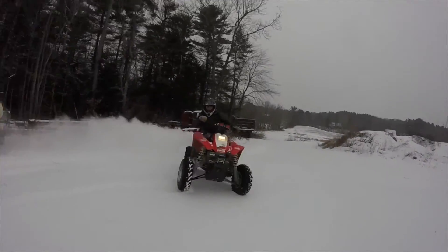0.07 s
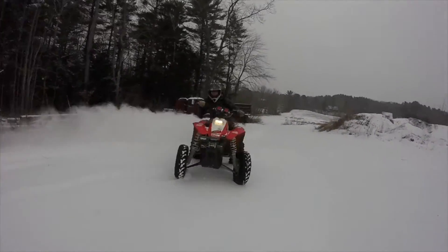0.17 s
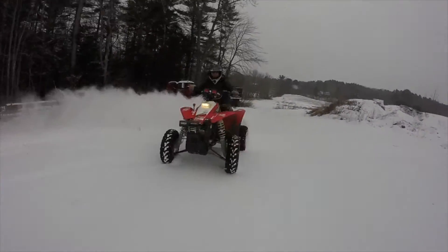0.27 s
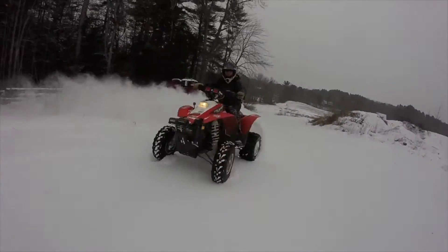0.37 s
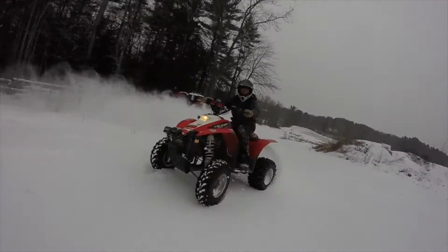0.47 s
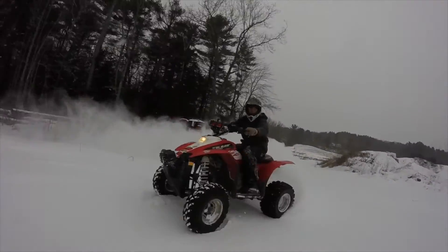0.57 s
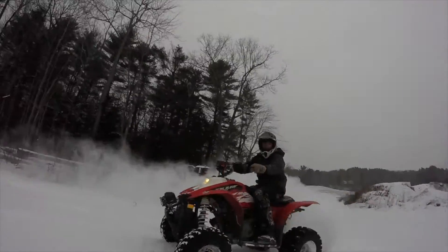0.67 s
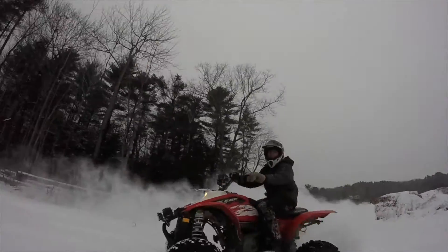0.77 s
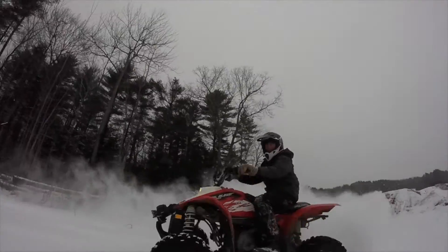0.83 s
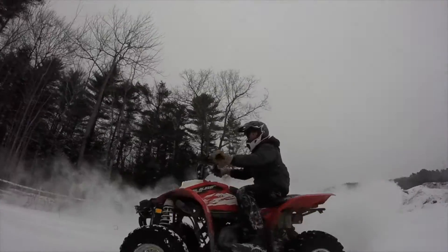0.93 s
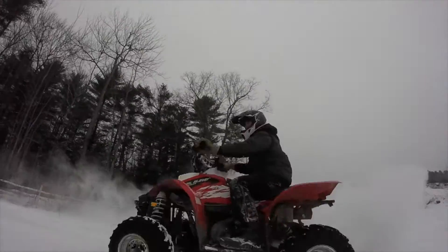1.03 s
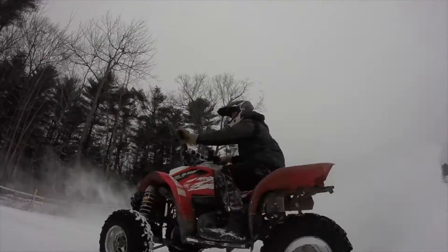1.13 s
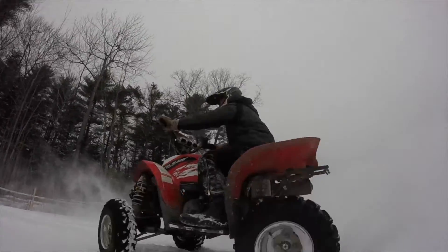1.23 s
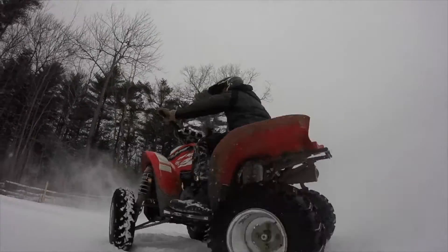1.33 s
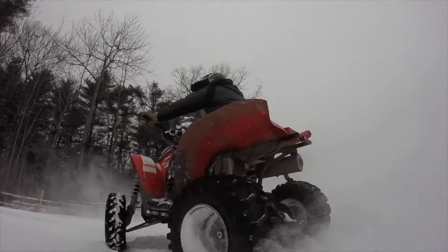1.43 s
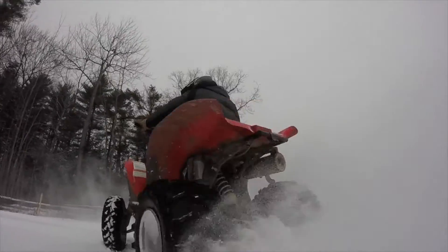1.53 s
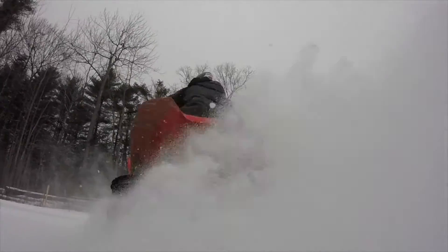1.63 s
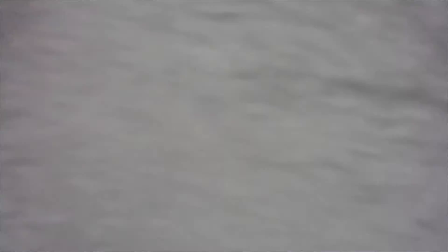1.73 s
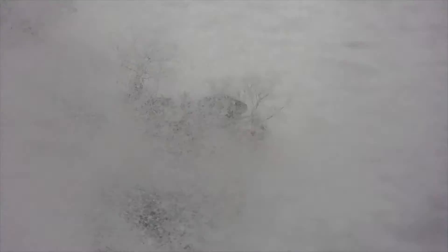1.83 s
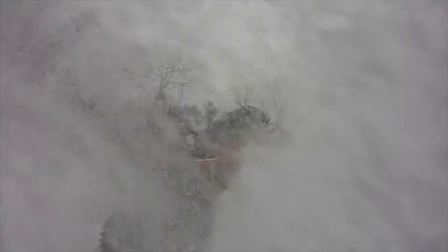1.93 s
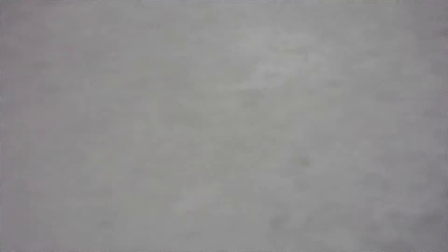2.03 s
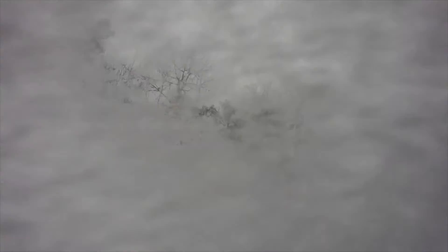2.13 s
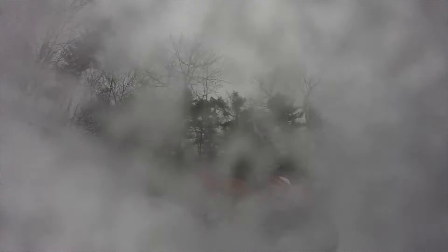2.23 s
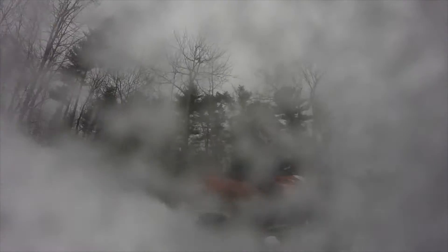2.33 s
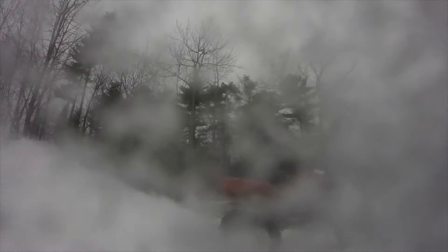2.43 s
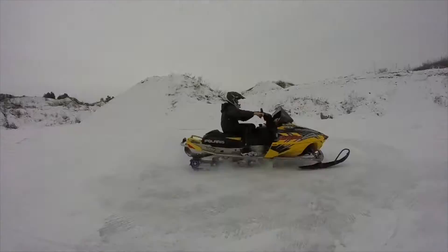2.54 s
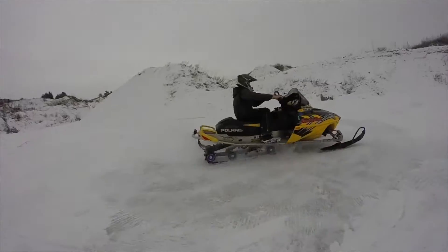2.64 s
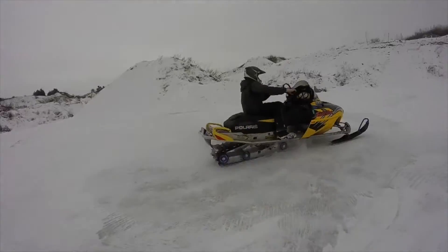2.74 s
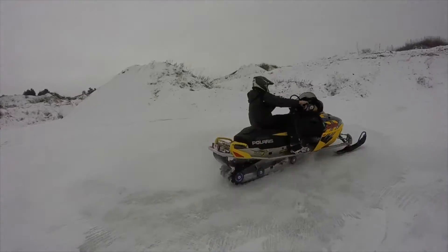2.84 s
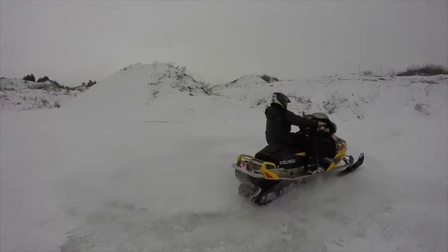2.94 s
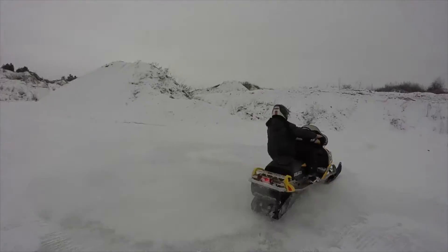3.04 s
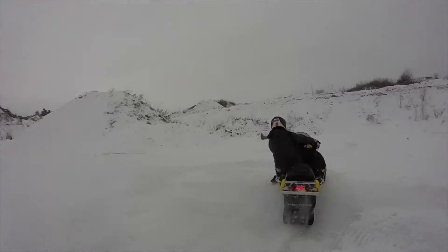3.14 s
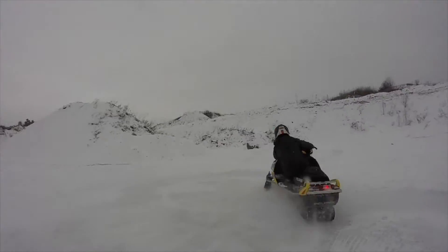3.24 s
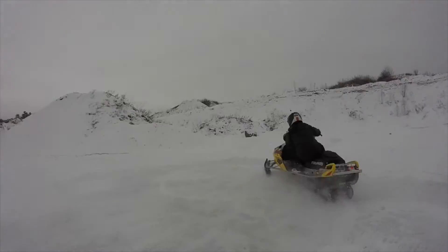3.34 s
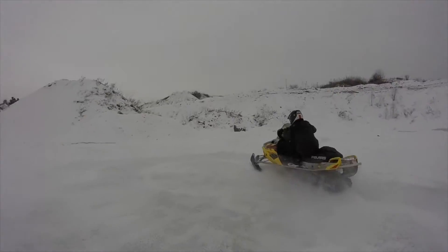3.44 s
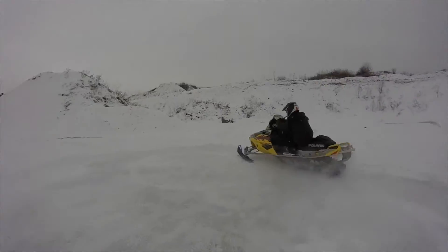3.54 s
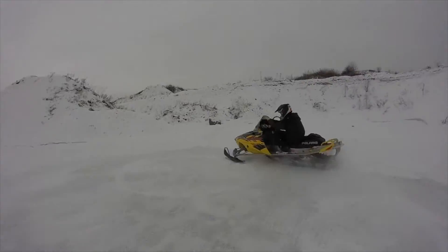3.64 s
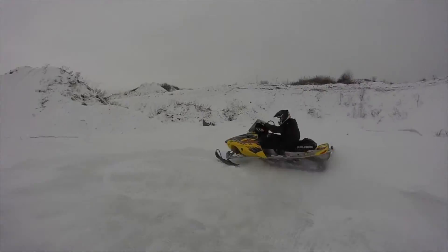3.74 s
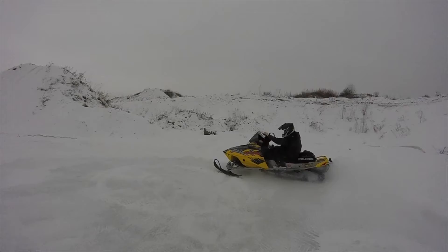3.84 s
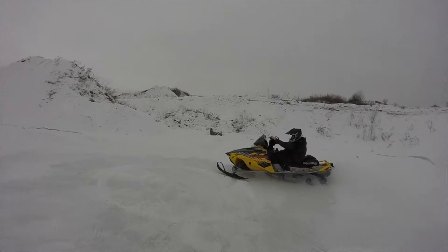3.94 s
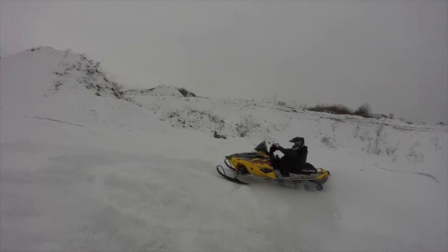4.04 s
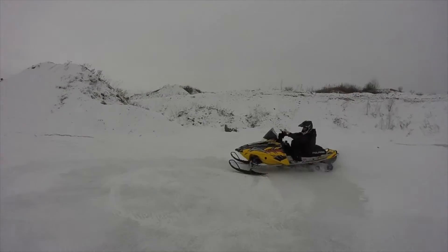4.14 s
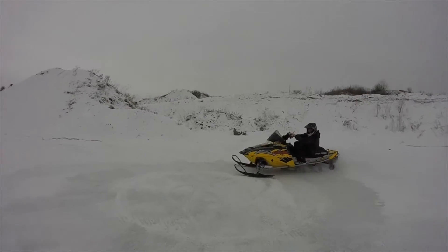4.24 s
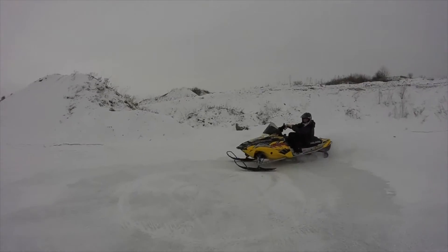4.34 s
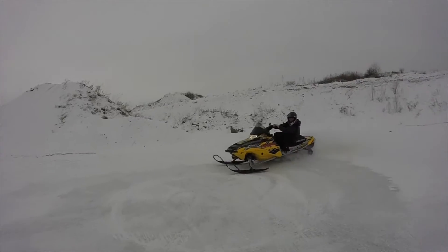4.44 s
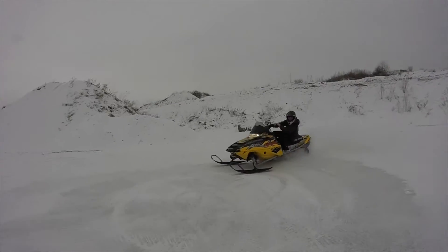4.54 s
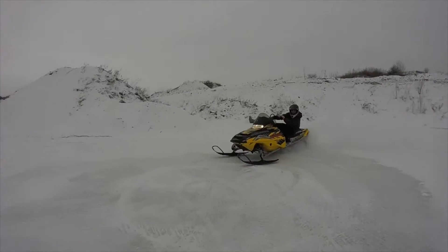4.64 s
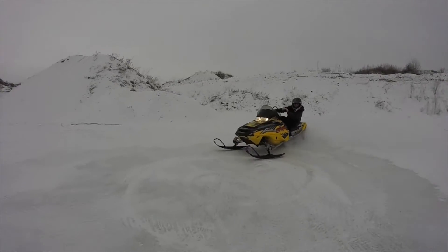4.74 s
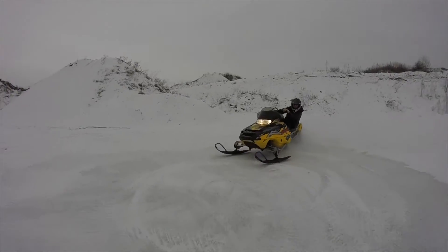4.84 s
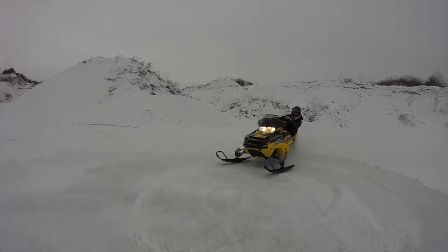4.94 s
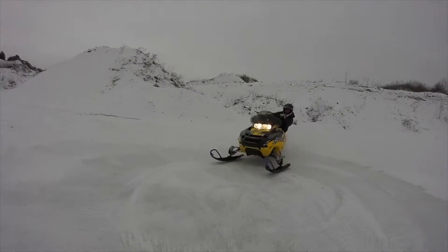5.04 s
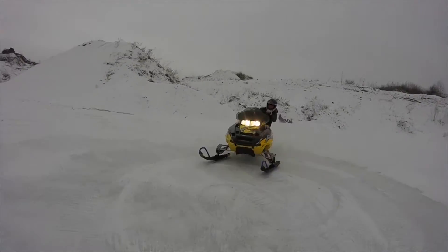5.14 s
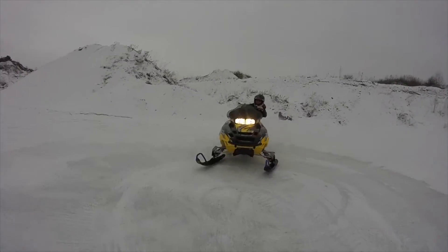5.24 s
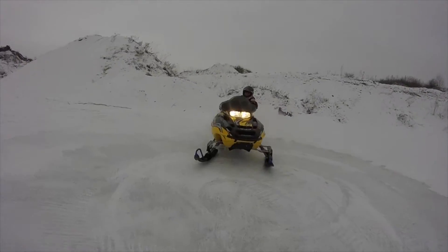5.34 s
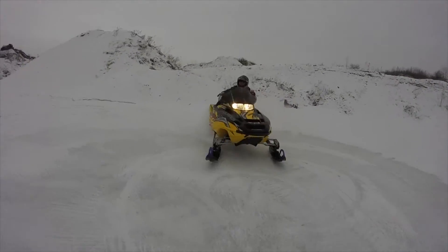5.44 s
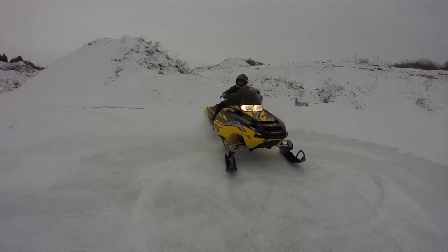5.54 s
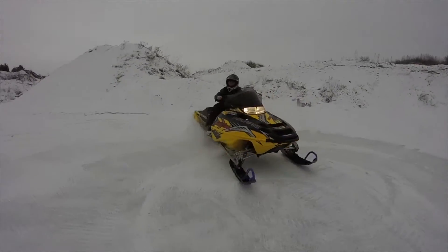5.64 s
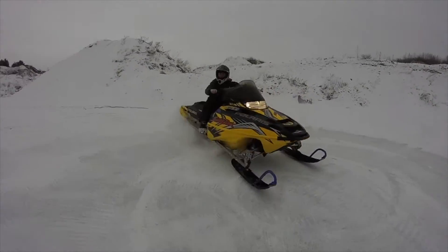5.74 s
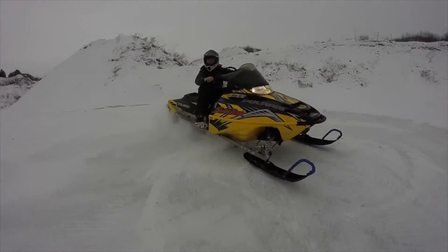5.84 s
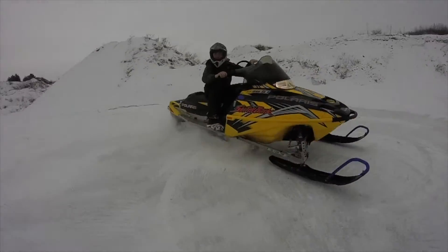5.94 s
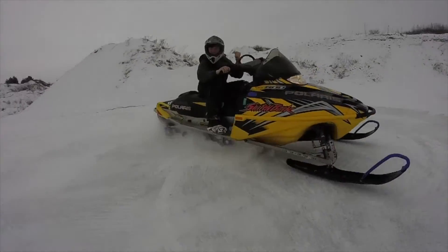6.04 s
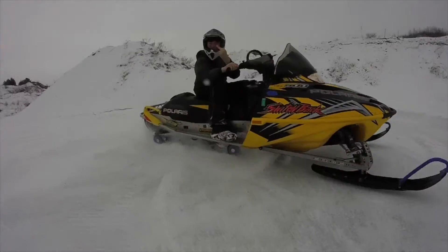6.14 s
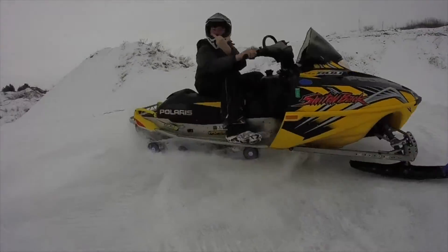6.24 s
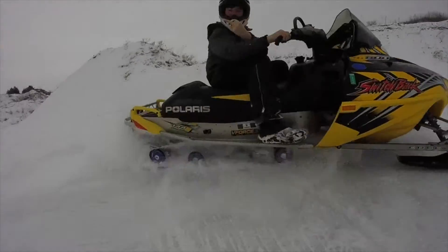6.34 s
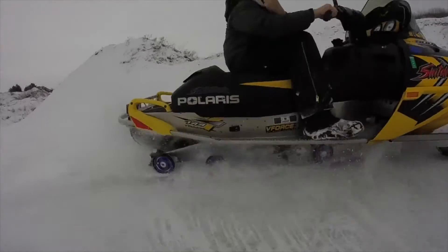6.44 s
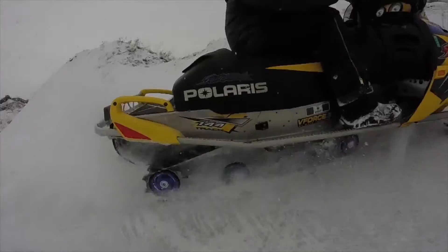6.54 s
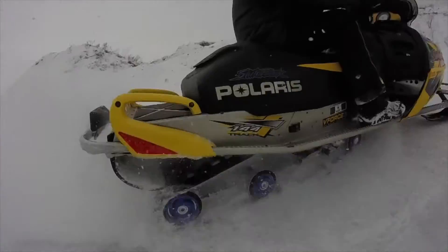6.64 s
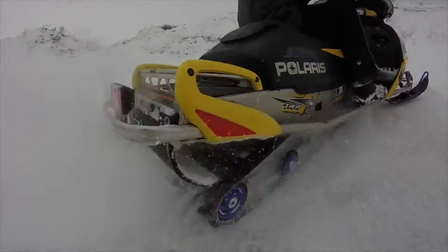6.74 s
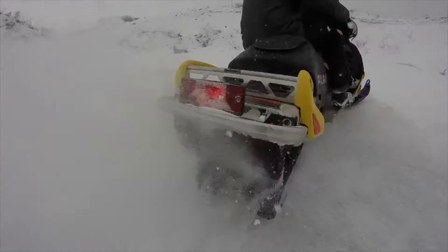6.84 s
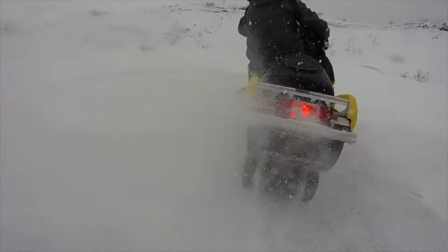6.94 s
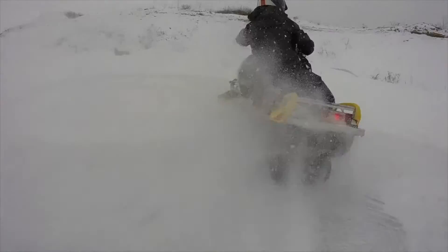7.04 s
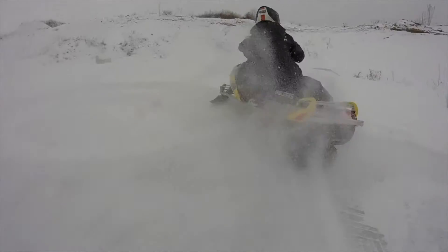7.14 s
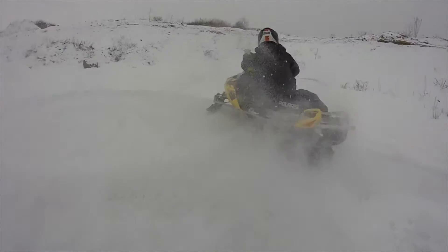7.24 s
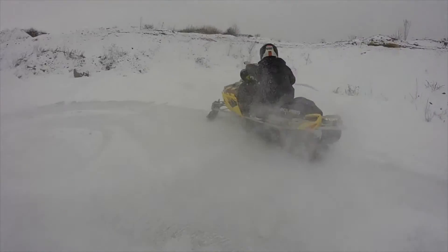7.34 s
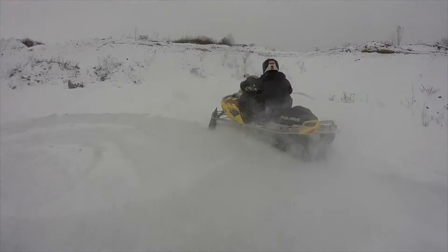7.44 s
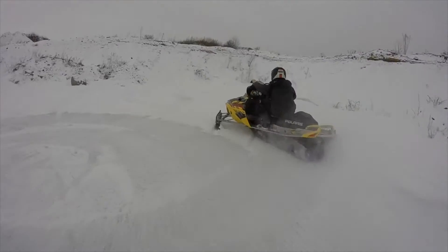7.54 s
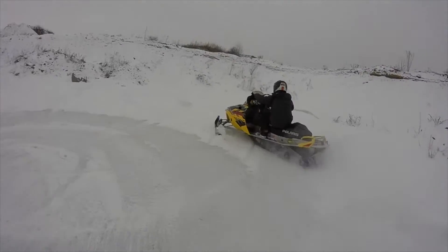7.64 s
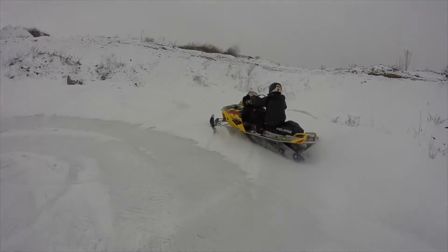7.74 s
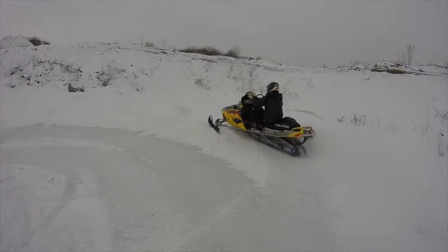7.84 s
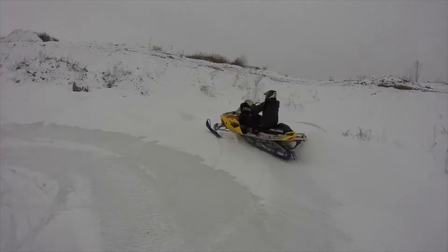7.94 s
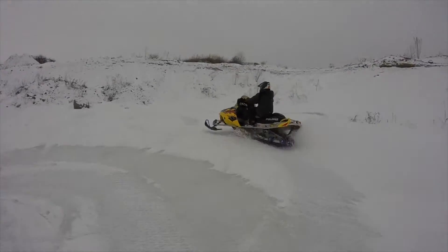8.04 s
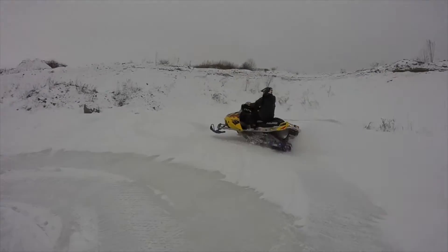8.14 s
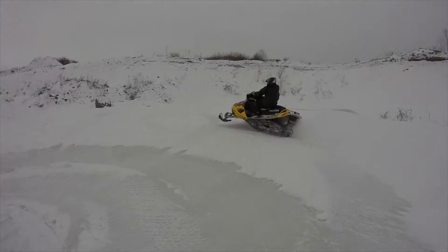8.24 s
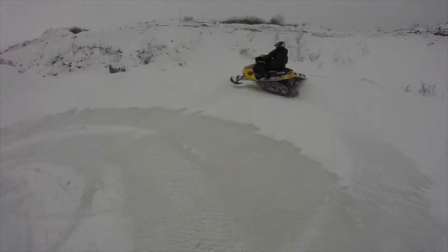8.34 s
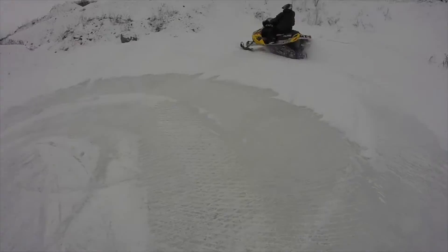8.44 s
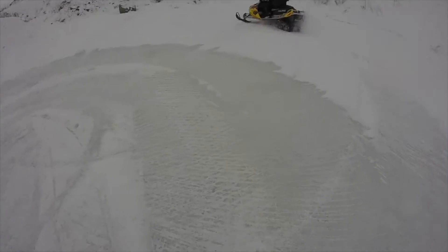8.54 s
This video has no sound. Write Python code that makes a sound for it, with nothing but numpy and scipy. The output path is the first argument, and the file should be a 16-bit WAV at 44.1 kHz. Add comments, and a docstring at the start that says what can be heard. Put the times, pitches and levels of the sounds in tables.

```python
"""A quad drives close past a camera in a hard housing: case resonances, exhaust partials and snow spray.
Lumps of snow strike the housing as its engine speed falls; gusts buffet the housing throughout.
Then, abruptly, a two-stroke snowmobile turns on blips of throttle: firing pulses excite body and pipe modes.
It passes at arm's length and rides off with its track drumming, while flung ice crumbs tick as noise bursts."""
import sys
import numpy as np
from scipy import signal
from scipy.fft import rfft, irfft
from scipy.io import wavfile
from scipy.ndimage import uniform_filter1d

SR = 44100
rng = np.random.default_rng(int(sys.argv[2]) if len(sys.argv) > 2 else 0)


def put_to_file(sound):
    """Save the sound as 16-bit audio at rate SR, in the file named by the first command-line argument."""
    columns = np.atleast_2d(sound).T  # one column per channel
    safe = np.clip(columns, -1, 1)
    whole_steps = np.round(safe * 32767)
    wavfile.write(sys.argv[1], SR, whole_steps.astype(np.int16))


N = 379260
TIME = np.arange(N) / SR  # [s]

# snowmobile exhaust partials: (multiple of the firing rate, relative level [dB])
SLED_PARTIALS = [(.5, -19.5), (1, -4.5), (2, -1.5), (3, -1.5)]
# transmission of the silencer: (frequency [Hz], gain [dB])
SILENCER_RESPONSE = [(110, -2), (150, -2.5), (190, -11), (235, -6.5), (290, -4), (350, 0), (470, 0),
                     (530, -9)]
# body modes that the firings sweep through: (frequency [Hz], width [Hz], gain [dB])
SLED_BODY_MODES = [(1135, 70, -6), (1210, 55, -2), (1385, 75, 1), (1620, 110, 1), (2130, 130, -9),
                   (2500, 170, -8), (3300, 350, -21), (4250, 250, -29)]
# tuned-pipe modes, each applied twice: (frequency [Hz], width per pass [Hz], gain per pass [dB])
PIPE_MODES = [(2113, 167, 23), (2529, 107, 24)]
# relative spectra of rasp, gas, cowl snarl, track rumble, track hiss and tunnel: (frequency [Hz], level [dB])
RASP_SPECTRUM = [(600, -32), (900, -13), (1060, 0), (1650, 0), (2000, -4), (3600, -8), (7000, -40)]
GAS_SPECTRUM = [(400, -21), (850, -22), (1150, -2.5), (1400, -1.5), (1650, 4.5), (1950, -8.5), (2450, -8),
                (2950, -17), (3500, -10), (4000, -46), (5200, -38), (15000, -91)]
SNARL_SPECTRUM = [(1900, -25), (2400, -2), (3100, 0), (3500, -10), (4100, -14), (4600, -34), (15000, -70)]
RUMBLE_SPECTRUM = [(40, -60), (130, 22), (300, 21.5), (500, 24.5), (750, 21.5), (1200, -22.5)]
HISS_SPECTRUM = [(3000, 8), (4850, 4), (5350, -4.5), (6150, 7), (6900, 0), (7800, -2), (8900, -3.5),
                 (10000, -14), (11200, -15), (15000, -29)]
TUNNEL_SPECTRUM = [(60, -22), (110, 1), (170, 6), (280, -11.5), (800, -37)]
# level with distance along the loop: (time [s], level [dB])
SLED_NEARNESS_CURVE = [(2.72, -22), (2.98, -22), (3.2, -25), (3.42, -23), (4.85, -29.5), (5.4, -24),
                       (5.8, -22.5), (6.2, -20), (7.13, -17.5), (7.55, -24.5), (7.9, -27), (8.2, -31),
                       (8.6, -32.5)]
# mouth of the pipe points at us: (time [s], half length [s], relative level [dB])
PIPE_BEAM_SWELLS = [(2.6, .022, -6), (6.17, 0.23, 1.5), (6.39, 0.13, 1.5), (6.8, 0.048, -2.5),
                    (7.78, .1, -10)]
# high harmonics leave the cowl at arm's length: (time [s], half length [s], relative level [dB])
COWL_SWELLS = [(6.3, .1, -18), (6.62, .17, -7)]
# modes that blare as it swings by: (time [s], half length [s], relative level [dB], frequency [Hz])
BLARES = [(3.549, 0.29, -7, 1159), (5.092, 0.096, -3.5, 1170), (5.484, 0.097, -1.5, 1677),
          (6.019, .07, -7, 1605), (6.25, 0.27, -10.5, 1473), (6.679, 0.069, -2, 1095),
          (5.897, 0.092, -12.5, 1214), (7.853, 0.17, -4.5, 1627)]
# exhaust pops on the overrun: (time [s], level [dB], decay [s])
EXHAUST_POPS = [(5.768, -16.5, 0.0054), (6.971, -24, .005), (7.108, -11, 0.0048), (8.561, -28, 0.013)]
AWAY_S, AWAY_TURN_S = 6.88, 0.17  # the tail turns to us: centre and length [s]
# relative levels [dB], and their changes once the tail faces us or the throttle opens
BITE_DB, BITE_AWAY_DB = -4.2, -7
WHISTLE_DB, WHISTLE_AWAY_DB = -9.5, -17
RUMBLE_DB, RUMBLE_AWAY_DB, RUMBLE_THROTTLE_DB = -20, -4, -3
HISS_DB, HISS_AWAY_DB, TUNNEL_DB = -17.5, -2.5, -23
REVS_DB_PER_OCTAVE, THROTTLE_DB = 10.5, 0.76
BARK_LAG_S = 0.044  # the pipe's loudness trails the throttle
TICKOVER_HZ, TICKOVER_DB = 132.6, 14.5  # below this rate the exhaust note thrums
TRACK_FALLOFF = 0.37  # extra track level, dB per dB of nearness
BLARE_WIDTH_HZ = 87  # per filter pass


def snowmobile():
    """Source-filter principle: a two-stroke's pulses and gas excite body and pipe; the track churns snow."""
    hz, throttle, blip_db, exhaust_db = rider()
    near_db, = curves(SLED_NEARNESS_CURVE)
    away = ramp(AWAY_S, AWAY_TURN_S)
    unsteady_hz = hz * (1 + .002 * (1 + away) * walk(40))
    cycles = np.cumsum(unsteady_hz) / SR
    octaves = np.log2(hz / np.mean(hz))
    # the pipe comes on song as the revs climb
    bark = np.interp(TIME - BARK_LAG_S, TIME, uniform_filter1d(throttle, size=3000))
    level_db = near_db + blip_db + REVS_DB_PER_OCTAVE * octaves + THROTTLE_DB * bark

    exhaust_db = exhaust_db + TICKOVER_DB * np.clip((TICKOVER_HZ - hz) / 10, 0, 1)
    exhaust_db = exhaust_db - 1.5 + 12 * octaves + 3 * throttle - 2.5 * away
    exhaust = undb(exhaust_db) * colour(note(cycles, SLED_PARTIALS, waver_db=2.2), SILENCER_RESPONSE)
    pulses = firings(cycles, jitter_s=.000009, scatter_db=1.1, weak_db=-1)
    # rattling through the bodywork, the firings come out more ragged
    ragged = firings(cycles, jitter_s=.000021, scatter_db=2.1, weak_db=-1.5)
    # each body mode swells and fades on its own
    body = sum(ring(ragged, [mode]) * undb(3 * walk(22)) for mode in SLED_BODY_MODES)

    # an open throttle fires cleanly; on the overrun the firings blur into gas noise
    rasp_db = BITE_DB + BITE_AWAY_DB * away + 3.5 * throttle
    rasp = undb(rasp_db) * unit(colour(body, RASP_SPECTRUM))
    gas_db = -4.1 - 2.1 * throttle + 1.2 * walk(60)
    gas = undb(gas_db) * unit(colour(puffs(cycles / 2, length=.45, steady=.7), GAS_SPECTRUM))

    whistle = undb(WHISTLE_DB + WHISTLE_AWAY_DB * away) * pipe(ragged)
    whistle = whistle + swells(PIPE_BEAM_SWELLS) * pipe(pulses)
    snarl = swells(COWL_SWELLS) * unit(colour(pulses, SNARL_SPECTRUM))
    blare = flares(pulses, BLARES, BLARE_WIDTH_HZ) + snarl

    drumming = undb(TUNNEL_DB) * away * unit(colour(rng.standard_normal(N), TUNNEL_SPECTRUM))
    rumble_db = RUMBLE_DB + RUMBLE_AWAY_DB * away + RUMBLE_THROTTLE_DB * throttle
    rumble = undb(rumble_db) * unit(colour(grains(2500, spread_db=-6.5), RUMBLE_SPECTRUM))
    hiss_db = HISS_DB + HISS_AWAY_DB * away + 10 * octaves
    hiss = undb(hiss_db) * unit(colour(puffs(cycles, length=1.0, steady=1.0), HISS_SPECTRUM))
    # the track's noise dies away with distance faster than the engine
    track_db = TRACK_FALLOFF * (near_db - np.median(near_db))
    track = undb(track_db) * (rumble + hiss) + drumming
    machine = exhaust + rasp + gas + whistle + blare + track
    return undb(level_db) * machine + skis() + impacts(EXHAUST_POPS, GAS_SPECTRUM)


def pipe(x):
    """Pipe resonance: two narrow modes whistle with a wavering level."""
    waver = undb(walk(28))
    return waver * unit(sum(ring(ring(x, [mode]), [mode]) for mode in PIPE_MODES))


# throttle blips: (opens [s], shuts [s], rate pulled towards [Hz], rate fallen back towards [Hz],
# relative loudness [dB], base level of the exhaust note, before revs, throttle, tickover and turning away [dB])
THROTTLE_BLIPS = [(2.5, 2.59, 195.7, 139.8, -3.5, -6), (2.81, 3.011, 246, 147.2, 1, -10),
                  (3.26, 3.412, 252.4, 149.7, -1, -14), (3.605, 3.698, 220.7, 150.7, -1.5, -14.5),
                  (3.836, 4.063, 234, 152, -1, -11), (4.152, 4.367, 302, 146.1, -0.5, -11),
                  (4.571, 4.742, 289.9, 146.1, 2, -11.5), (4.975, 5.102, 256.8, 149.2, 1, -11.5),
                  (5.202, 5.433, 264, 152, -1, -12), (5.527, 5.69, 211.2, 152.3, -2, -11),
                  (5.785, 5.906, 253.4, 190.6, -2, -11), (6.026, 6.146, 246, 199.1, -2.5, -9),
                  (6.274, 6.398, 241, 196.1, -1.5, -11), (6.472, 6.602, 245.5, 193, -1, -10),
                  (6.692, 6.812, 246.7, 144, -0.5, -10), (7.151, 7.38, 207.7, 160, 1.5, -17.5),
                  (7.6, 7.86, 221.2, 113.4, 2, -17.5)]
CLIMB_S, SINK_S = .278, .177  # time constants of the revs
IDLE_HZ, HALF_THROTTLE_HZ = 150, 180  # resting rates for throttle -1 and 0


def rider():
    """First-order lag: revs relax exponentially; gives rate, throttle (-1 shut, 1 open) and two levels."""
    hz = np.full(N, float(THROTTLE_BLIPS[0][2]))
    throttle, blip_db, exhaust_db = np.zeros((3, N))
    for opens, shuts, goal_hz, rest_hz, db, note_db in THROTTLE_BLIPS:
        eased = np.clip((rest_hz - HALF_THROTTLE_HZ) / (HALF_THROTTLE_HZ - IDLE_HZ), -1, 1)
        moves = [(opens, goal_hz, CLIMB_S, 1), (shuts, rest_hz, SINK_S, eased)]
        for s, towards_hz, lag_s, lever in moves:
            i = min(int(s * SR), N - 1)
            hz[i:] = towards_hz + (hz[i] - towards_hz) * np.exp(-TIME[:N - i] / lag_s)
            throttle[i:] = lever
        blip_db[int(opens * SR):] = db
        exhaust_db[int(opens * SR):] = note_db
    # the flywheel rounds off the turns of the revs
    rounded_hz = uniform_filter1d(hz, size=2000)
    return [rounded_hz] + [uniform_filter1d(x, size=1000) for x in (throttle, blip_db, exhaust_db)]


# ski hiss in the turn: (time [s], half length [s], level [dB])
SKI_SWELLS = [(3.85, 0.99, -56.5)]
# its resonance, applied twice: (frequency [Hz], width per pass [Hz], gain per pass [dB])
SKI_MODE = [(7630, 490, 0)]


def skis():
    """Narrow-band friction noise: the skis hiss as they carve the turn."""
    friction = ring(ring(rng.standard_normal(N), SKI_MODE), SKI_MODE)
    return swells(SKI_SWELLS) * unit(friction)


# quad firing rate: (time [s], rate [Hz])
QUAD_RATE = [(0, 55.1), (.6, 54.6), (1.2, 56.85), (1.8, 54.85), (1.95, 55.05), (2.3, 46), (2.58, 36)]
# quad exhaust partials: (multiple of the firing rate, front level [dB], rear level [dB]), both relative
QUAD_PARTIALS = [(1, -3.5, -6), (2, 1, -1.5), (3, -19, -11), (4, -15.5, -7.5), (5, -14, -17.5),
                 (6, -7, -15)]
# engine-case modes: (frequency [Hz], width [Hz], gain [dB])
CASE_MODES = [(1654, 16.5, 4), (2020, 55, -11), (3430, 130, -3)]
# relative spectra of the rattling body and of the snow spray: (frequency [Hz], level [dB])
BODY_SPECTRUM = [(100, -30.5), (400, -13.5), (900, -18.5), (1150, -25.5), (1450, 6.5), (1650, 5),
                 (1900, -14.5), (2450, -18), (2850, -29), (3250, 3), (3750, -24), (5100, -35), (6400, -22),
                 (12000, -81)]
SPRAY_SPECTRUM = [(200, -4), (1000, 0), (2400, 8.5), (4000, 1), (5200, -13.5), (6300, 5.5), (7800, -6),
                  (9200, -6), (10200, -14), (15000, -24)]
# the engine case sings: (time [s], half length [s], level [dB])
CASE_SONG = [(.3, 0.061, -18.5), (1.07, 0.072, -17.5), (1.22, 0.22, -19.5)]
# panels sing in turn: (time [s], half length [s], level [dB], frequency [Hz])
PANELS = [(0.27, 0.31, -42, 2050), (0.16, 0.13, -41.5, 2560), (0.88, .16, -36, 2600),
          (1.06, 0.31, -32.5, 2420), (1.0, 0.32, -43, 2030)]
# chain and tyres sizzle: (time [s], half length [s], level [dB], frequency [Hz])
SIZZLE_BANDS = [(.85, .15, -41.5, 6080), (.85, 0.15, -46, 6700), (0.977, 0.35, -58.5, 9200),
                (1.65, 0.21, -51, 9000)]
PANEL_WIDTH_HZ, SIZZLE_WIDTH_HZ = 105, 370  # per filter pass
QUAD_PASS_S, QUAD_MISS_M, QUAD_M_PER_S = 1.64, 1.025, 1.72  # a straight line past us
CLATTER_DB, EXHAUST_DB, SPRAY_DB = -24, -32.5, -32  # gains at 1 m, side on
EXHAUST_TAIL_DB, SPRAY_TAIL_DB = 9, 3.5  # added tail on, taken away head on
EXHAUST_COAST_DB = -7


def quad():
    """Spherical spreading and directivity: case, exhaust and snow spray change as one cylinder drives by."""
    hz, = curves(QUAD_RATE)
    along_m = QUAD_M_PER_S * (TIME - QUAD_PASS_S)
    distance_m = np.hypot(along_m, QUAD_MISS_M)
    tail = along_m / distance_m  # -1 head on, 1 tail on
    cycles = np.cumsum(hz) / SR
    behind = np.clip((TIME - 1.25) / 0.21, 0, 1)
    partials = [(k, front + behind * (back - front)) for k, front, back in QUAD_PARTIALS]
    exhaust = note(cycles, partials, waver_db=2.0)

    knocks = firings(cycles, jitter_s=.00003, scatter_db=1.8, weak_db=0)
    case = colour(ring(knocks, CASE_MODES), [(600, -17), (1400, 6.5), (3500, -6.5), (6000, -23)])
    # the strongest mode is fed by every knock and sings on between them
    whine = ring(ring(case, CASE_MODES[:1]), CASE_MODES[:1])
    rattle = colour(puffs(cycles, length=1.0, steady=1.0), BODY_SPECTRUM)
    # off the throttle the engine clanks on every second firing
    coasting = np.clip((TIME - 1.7) / 0.12, 0, 1)
    clanks = colour(firings(cycles / 2, jitter_s=.001, scatter_db=3, weak_db=0), BODY_SPECTRUM)
    engine = undb(-5 - 3.5 * behind) * unit(case)
    engine += undb(-2.3 + .3 * behind - 1.2 * coasting) * unit(rattle)
    engine += undb(-6.5) * coasting * unit(clanks)

    throb = 1 + 0.24 * np.exp(-(cycles % 1) / 1.3)
    spray = unit(colour(grains(20000, spread_db=4.5) * throb, SPRAY_SPECTRUM))
    # from the front the spray has a slight lift on either side of 9 kHz
    front_spray = colour(spray, [(6500, 2.0), (9000, 0), (15000, 2.0)])
    spray = front_spray + behind * (spray - front_spray)

    exhaust_db = EXHAUST_DB + EXHAUST_TAIL_DB * tail + EXHAUST_COAST_DB * ramp(1.8, length_s=0.15)
    machine = undb(CLATTER_DB) * engine + undb(exhaust_db) * exhaust
    machine += undb(SPRAY_DB + SPRAY_TAIL_DB * tail) * spray
    panel_drive = unit(knocks) + 1.6 * unit(puffs(cycles, length=0.74, steady=0.33))
    panels = flares(panel_drive, PANELS, PANEL_WIDTH_HZ)
    sizzle = flares(puffs(cycles, length=.5, steady=.4), SIZZLE_BANDS, SIZZLE_WIDTH_HZ)
    return snow_cover() * machine / distance_m + swells(CASE_SONG) * unit(whine) + panels + sizzle


# snow showers off the rear tyres: (time [s], half length [s], level [dB])
SNOW_SHOWERS = [(1.885, 0.043, -20), (1.975, 0.019, -33), (2.16, 0.043, -31.5)]
# soft clods on the housing: (time [s], relative level [dB], crumbling time [s])
SNOW_CLODS = [(.5055, -11, 0.0091), (.531, -12.5, 0.0058), (1.08, -13.5, .0024), (1.856, -5.5, 0.0078),
              (1.8825, 0.5, 0.0052), (1.909, -2, 0.0085), (1.94, -12.5, 0.012), (2.1425, -7, 0.0059),
              (2.1635, -10.5, 0.0078), (2.298, -21, 0.0015)]
# heavy lumps that jolt the camera: (time [s], relative level [dB], decay [s])
HEAVY_JOLTS = [(.506, -13.5, 0.0092), (1.903, -6.5, 0.0059)]
# ice crumbs on the housing: (time [s], relative level [dB])
ICE_CRUMBS = [(1.902, 0), (2.149, -9.5), (2.191, -17), (3.755, -24), (6.9806, -11), (7.05, -12.5),
              (7.0582, -19), (7.0956, -12.5), (7.1021, -17), (7.1724, -15.5), (7.2512, -23), (7.44, -25),
              (7.466, -20.5)]
# relative spectra of showers, clods, jolts and crumbs: (frequency [Hz], level [dB])
SHOWER_SPECTRUM = [(300, -16), (1000, -9), (1600, 2), (3500, 3), (5000, -7.5), (6500, 0), (9000, -1.5),
                   (15000, -14)]
CLOD_SPECTRUM = [(400, -15), (850, -16.5), (1300, 0), (1700, 6.5), (2000, -4.5), (2400, 10), (3000, -7.5),
                 (3800, 0.5), (5000, -13), (6300, -9), (9500, -18), (11000, -24), (15000, -30)]
JOLT_SPECTRUM = [(50, -2.5), (450, -11.5), (1000, -26), (8000, -62)]
CRUMB_SPECTRUM = [(1000, -65), (3000, 14), (4500, 8.5), (7000, 11), (10000, 6), (15000, -3)]


def thrown_snow():
    """Impact noise: showers crackle, clods crunch, the heaviest thud, icy lumps knock and crumbs tick."""
    crackle = swells(SNOW_SHOWERS) * unit(colour(grains(6000, spread_db=3.0), SHOWER_SPECTRUM))
    clods = impacts(SNOW_CLODS, CLOD_SPECTRUM)
    jolts = impacts(HEAVY_JOLTS, JOLT_SPECTRUM)
    crumbs = impacts([(s, db, .0014) for s, db in ICE_CRUMBS], CRUMB_SPECTRUM)
    return crackle + knock() + undb(-5.5) * (clods + jolts) + undb(-6) * crumbs


# icy lumps on the housing: (time [s], peak level [dB])
ICY_LUMPS = [(0.5067, 0), (1.8835, -6), (2.1427, -1), (2.163, -2.5)]
# housing modes: (frequency [Hz], width [Hz], relative gain [dB])
HOUSING_MODES = [(1920, 220, 6), (2350, 230, 11), (2610, 180, -10), (3640, 230, -8.5)]


def knock():
    """Impulse response: icy lumps set the housing ringing for a few milliseconds."""
    blows = np.zeros(N)
    for s, db in ICY_LUMPS:
        blows[int(s * SR)] = undb(db)
    peak = np.max(ring(signal.unit_impulse(SR), HOUSING_MODES))
    return ring(blows, HOUSING_MODES) / peak


# loads of snow that stick to the housing: (time [s], added gain [dB])
STUCK_SNOW = [(1.94, -10), (2.19, -8.5)]


def snow_cover():
    """Transmission loss: gain left by the snow that sticks to the housing."""
    return undb(sum(db * ramp(s, length_s=0.033) for s, db in STUCK_SNOW))


# gusts on the housing: (time [s], half length [s], level added to the breeze [dB])
WIND_GUSTS = [(.4, 0.062, -39.5), (.74, 0.091, -33)]
# relative wind spectrum: (frequency [Hz], level [dB])
WIND_SPECTRUM = [(8, 3), (18, 5), (40, -14), (80, -12), (160, -17), (500, -46.5)]
BREEZE_DB = -46
SLED_START_S = 2.589  # the quad gives way to the snowmobile


def wind():
    """Turbulent pressure noise: low buffeting, weakened while snow covers the housing."""
    cover = np.where(TIME < SLED_START_S, snow_cover(), 1)
    strength = (undb(BREEZE_DB) + swells(WIND_GUSTS)) * cover
    turbulence = colour(rng.standard_normal(N), WIND_SPECTRUM) * undb(2.5 * walk(23))
    return strength * unit(turbulence)


def firings(cycles, jitter_s, scatter_db, weak_db):
    """Band-limited pulse train: one per cycle, uneven in time and strength; weak_db offsets every second."""
    count = int(cycles[-1])
    chance = rng.standard_normal((count, 2))
    at = np.interp(np.arange(count), cycles, np.arange(N)) + jitter_s * SR * chance[:, 0]
    strength = undb(scatter_db * chance[:, 1] + weak_db * (np.arange(count) % 2))
    # a windowed sinc places each pulse between samples
    taps = at.astype(int)[:, None] + np.arange(-7, 9)
    offset = taps - at[:, None]
    shape = np.sinc(offset) * np.sinc(offset / 8)
    places = np.clip(taps, 0, N - 1).ravel()
    return np.bincount(places, (strength[:, None] * shape).ravel(), N)


def puffs(cycles, length, steady):
    """Amplitude-modulated turbulence: gas bursts out once a cycle and dies away."""
    return (np.exp(-(cycles % 1) / length) + steady) * rng.standard_normal(N)


def note(cycles, partials, waver_db):
    """Additive synthesis: low exhaust partials, each wavering with the uneven combustion."""
    total = 0
    for k, db in partials:
        level = undb(db + waver_db * walk(35))
        multiple = round(2 * k) / 2  # nearest half order
        total = total + level * np.sqrt(2) * np.sin(2 * np.pi * (multiple * cycles + rng.random()))
    return total


def grains(per_s, spread_db):
    """Shot noise: dense tiny clicks of very unequal size."""
    size = undb(spread_db * np.minimum(rng.exponential(size=N), 4))
    return (rng.random(N) < per_s / SR) * rng.standard_normal(N) * size


def impacts(rows, outline):
    """Transient decay: noise bursts rise fast and die exponentially, one per (time, level, decay) row."""
    bursts = np.zeros(N)
    for s, db, decay in rows:
        start = int(s * SR)
        age = TIME[:min(SR // 8, N - start)]
        rise = 1 - np.exp(-6 * age / decay)
        # 2.5 dB makes up for the height lost to the rise
        bursts[start:][:len(age)] += undb(db + 2.5) * np.exp(-age / decay) * rise
    noise = rng.standard_normal(N)
    return colour(bursts * noise, outline) / np.std(colour(noise, outline))


def flares(x, rows, width_hz):
    """Transient resonance: modes of x swell and fade, one per (time, half length, level, frequency) row."""
    total = 0
    for s, half, db, hz in rows:
        mode = [(hz, width_hz, 0)]
        total = total + swells([(s, half, db)]) * unit(ring(ring(x, mode), mode))
    return total


def ring(x, modes):
    """Modal superposition: sum of (frequency [Hz], width [Hz], gain [dB]) resonances."""
    return sum(undb(db) * signal.lfilter(*signal.iirpeak(hz, hz / width, SR), x) for hz, width, db in modes)


def colour(x, points):
    """Minimum-phase filtering: a causal filter with the given (frequency [Hz], gain [dB]) outline."""
    size = 2 ** 15
    hz, db = np.transpose(points)
    freqs = np.maximum(np.arange(size // 2 + 1) * SR / size, 1)
    gain = undb(np.interp(np.log(freqs), np.log(hz), db))
    # folding the cepstrum onto positive times makes the response causal
    cepstrum = irfft(np.log(gain))
    cepstrum[1:size // 2] *= 2
    cepstrum[size // 2 + 1:] = 0
    response = irfft(np.exp(rfft(cepstrum)))[:size // 2]
    return signal.fftconvolve(x, response)[:N]


def walk(rate):
    """Low-pass random process: smooth drift with a spread near 1."""
    k = max(int(SR / rate), 2)
    held = np.repeat(rng.standard_normal(N // k + 1), k)
    return 1.245 * uniform_filter1d(uniform_filter1d(held, k), k)[:N]


def swells(rows):
    """Gaussian envelope: summed gain of (time [s], half length [s], level [dB]) swells."""
    return sum(undb(db) * np.exp(-((TIME - s) / half) ** 2) for s, half, db in rows)


def ramp(s, length_s):
    """Linear transition: rises from 0 to 1, centred on the time s."""
    return np.clip((TIME - s) / length_s + .5, 0, 1)


def curves(table):
    """Linear interpolation: one curve per column, straight between the rows."""
    s, *columns = np.transpose(table)
    return [np.interp(TIME, s, c) for c in columns]


def unit(x):
    """Power normalisation: scale to rms 1."""
    return x / np.sqrt(np.mean(x ** 2))


def undb(db):
    """Logarithmic level: decibels to amplitude gain."""
    return 10 ** (np.asarray(db) / 20)


def scene():
    """Free-field superposition: the quad gives way at once to the snowmobile; open snow returns no echo."""
    change = np.clip((TIME - SLED_START_S) / 0.0044, 0, 1)
    machines = (1 - change) * quad() + change * snowmobile()
    return (machines + thrown_snow() + wind())[None]


TOP_HZ = 15500  # upper edge of the passband


def record(dry):
    """Amplitude and band limiting: the camera clips at full scale and cuts the top."""
    clipped = np.clip(dry, -1, 1)
    low_pass = signal.ellip(8, .2, 70, TOP_HZ, fs=SR, output="sos")
    return signal.sosfilt(low_pass, clipped)


dry = scene()
out = record(dry)
put_to_file(out)
```